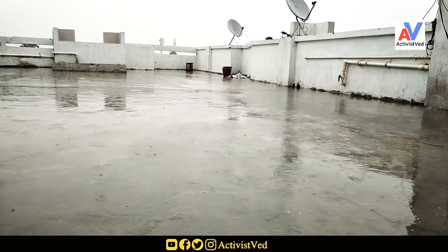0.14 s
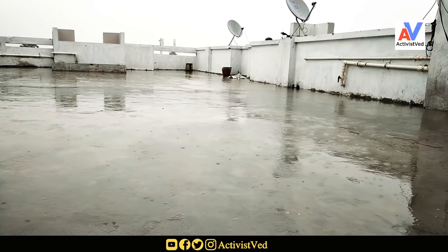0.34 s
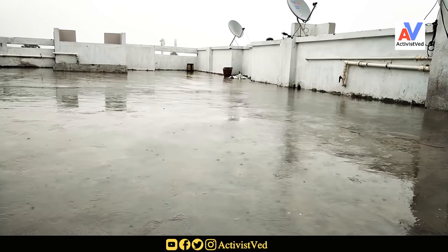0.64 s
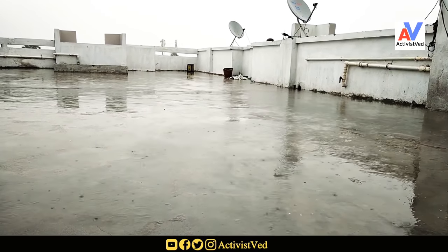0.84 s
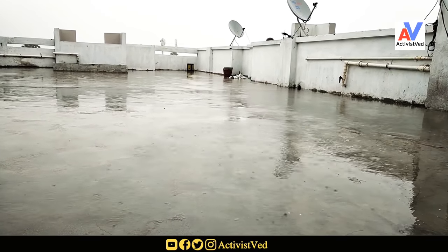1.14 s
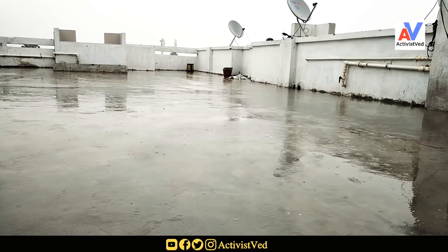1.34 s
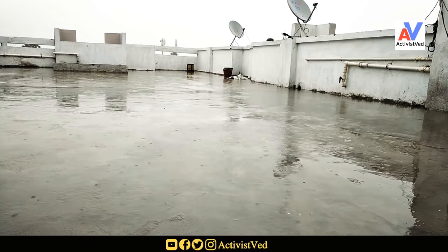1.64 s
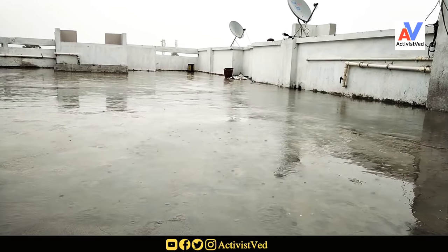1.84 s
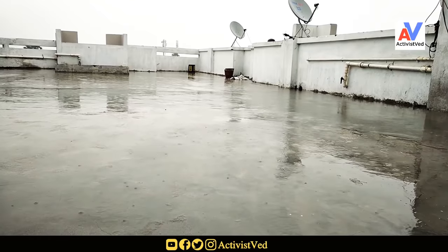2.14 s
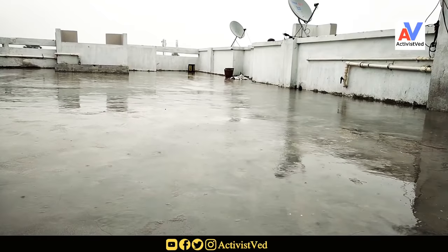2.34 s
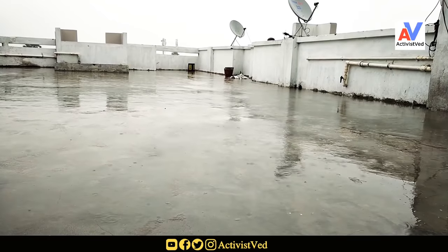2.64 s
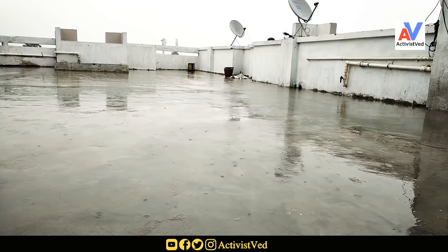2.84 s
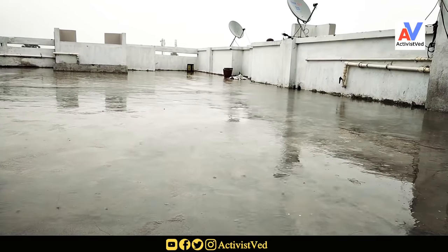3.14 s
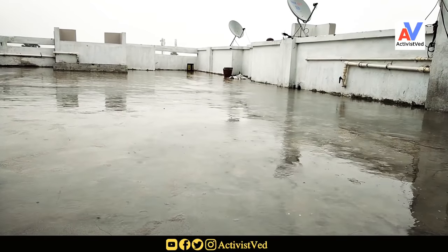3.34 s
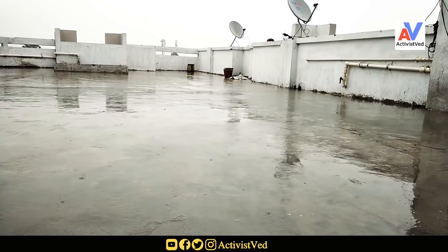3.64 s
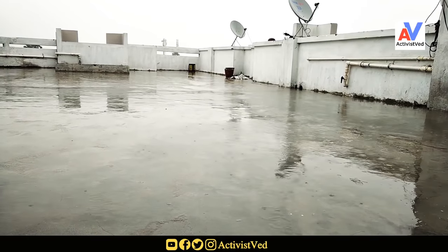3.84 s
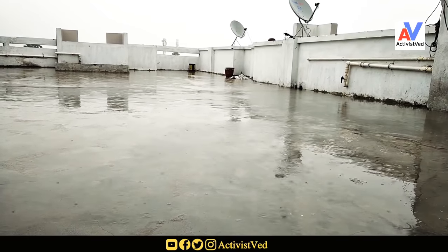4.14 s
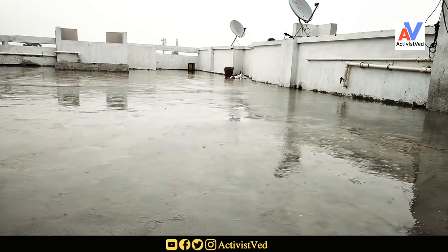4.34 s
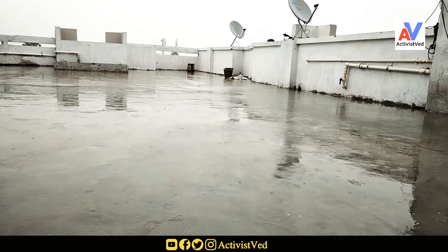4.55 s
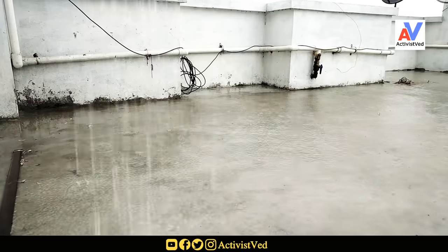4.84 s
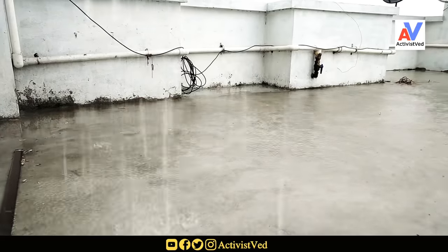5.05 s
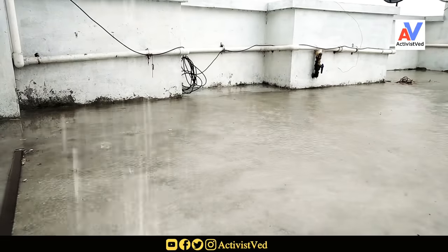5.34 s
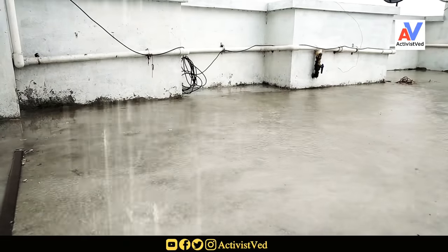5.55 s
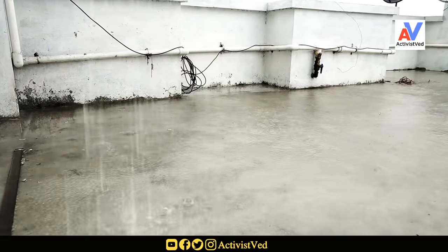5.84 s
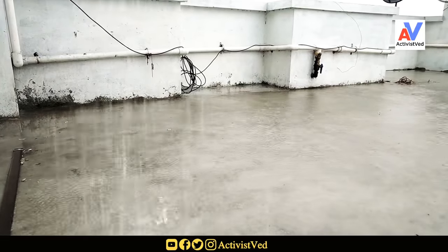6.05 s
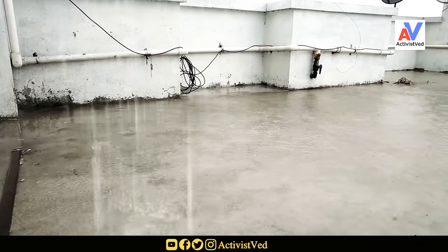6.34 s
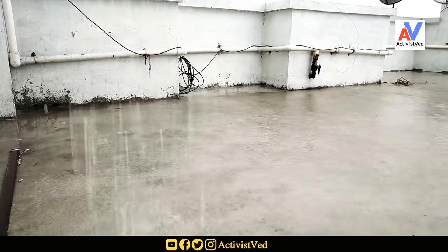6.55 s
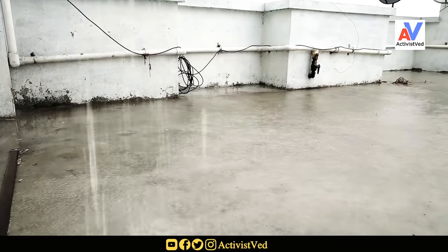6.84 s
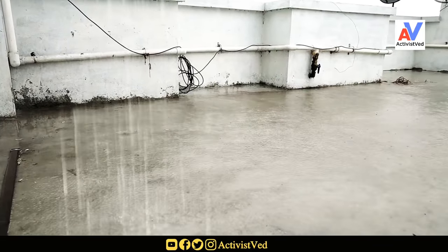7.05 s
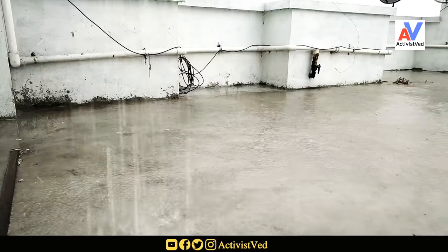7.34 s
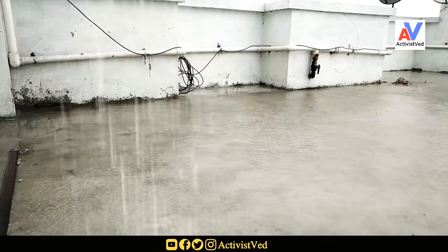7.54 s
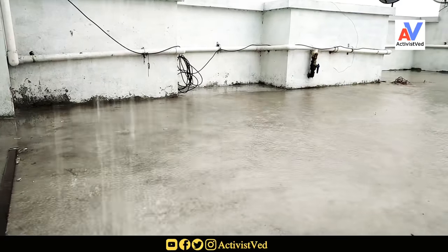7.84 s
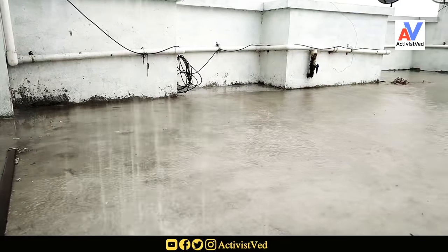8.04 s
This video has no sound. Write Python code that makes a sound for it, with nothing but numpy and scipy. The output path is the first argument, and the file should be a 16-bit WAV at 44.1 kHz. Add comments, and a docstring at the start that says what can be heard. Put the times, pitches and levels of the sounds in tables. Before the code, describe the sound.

Light rain falls on a wide wet concrete rooftop: a soft hissing patter with small crackling splashes and occasional tiny drip pings. Near the middle it stops for an instant, then much louder run-off hits the floor close to a wall, with irregular fat slaps, bright spatter and bubbling. A phone microphone outdoors picks up faint low wind; the deep bass is thin and the very top is dull.

```python
"""Flooded concrete roof in the rain, heard through a phone from two spots with a short silence between them.
Open roof first: a fine patter of random ticks over a noise wash, with single splashes as showers of droplets.
Then an edge where run-off falls in strings of fat drops: slaps, spatter, ringing bubbles, corner resonances.
Walls add echoes and a short noise tail; wind on the microphone is low noise with booming buffets."""
import sys
import numpy as np
from scipy import signal
from scipy.fft import rfft, irfft
from scipy.io import wavfile
from scipy.ndimage import map_coordinates

SR = 44100
rng = np.random.default_rng(int(sys.argv[2]) if len(sys.argv) > 2 else 0)


def unload_audio(sound):
    """Save the sound as a 16-bit wav file, at the path given as the first command line argument."""
    columns = np.transpose(np.atleast_2d(sound))
    # keep every value between -1 and 1, then stretch to whole-number steps
    steps = np.round(np.clip(columns, -1, 1) * 32767)
    wavfile.write(sys.argv[1], SR, steps.astype(np.int16))


N = 360738
TIME_S = np.arange(N) / SR

# slugs of run-off hitting the floor:
# start_s, slap_peak_db, slap_pitch_hz, time_to_thickest_spatter_s, body_db, spray_db (last two before trim)
RUNOFF_SLUGS = [(4.861, -30, 2710, 0.015, -47.5, -60), (5.029, -26.5, 3120, 0.015, -37, -43),
                (5.044, -19, 3140, 0.014, -53, -53), (5.107, -15.5, 2980, 0.0095, -37, -31),
                (5.188, -21, 2630, 0.0028, -35, -36), (5.269, -20.5, 2760, 0.017, -43, -33.5),
                (5.367, -19, 5650, 0.0027, -40, -25), (5.437, -16.5, 3300, 0.013, -30, -39),
                (5.5677, -9.5, 3160, 0.028, -35.5, -49), (5.623, -22.5, 3740, 0.02, -43, -34.5),
                (5.749, -15.5, 3020, 0.0015, -28, -27.5), (5.807, -24, 2560, 0.029, -40, -64),
                (5.884, -20, 3560, 0.0082, -36, -49), (5.977, -26, 3500, 0.0046, -40, -31.5),
                (6.132, -14.5, 5900, 0.0037, -45, -47), (6.151, -18, 4760, 0.0043, -43, -31),
                (6.171, -12.5, 3500, 0.021, -45, -32), (6.245, -20.5, 2580, 0.013, -32.5, -31),
                (6.302, -22.5, 2760, 0.022, -36.5, -55), (6.417, -15.5, 5800, 0.0097, -31.5, -32),
                (6.529, -29, 7800, 0.0075, -34, -33), (6.626, -16, 3330, 0.0099, -29, -37),
                (6.736, -13.5, 5900, 0.0032, -39, -47), (6.99, -18.5, 3070, 0.0027, -36, -56),
                (7.027, -24, 2440, 0.0026, -44, -58), (7.0416, -16.5, 2630, 0.012, -41, -37),
                (7.079, -16, 2740, 0.012, -30, -31.5), (7.132, -20, 3340, 0.013, -28.5, -28),
                (7.244, -26, 2730, 0.059, -46, -42), (7.284, -24, 3800, 0.0056, -27, -31),
                (7.372, -20, 6450, 0.0065, -30, -28.5), (7.474, -28.5, 3400, 0.037, -44, -39.5),
                (7.749, -26, 6630, 0.004, -44, -30.5), (7.831, -13.5, 2500, 0.022, -36, -33),
                (7.944, -10, 3370, 0.025, -36, -51), (8.078, -14, 6100, 0.0071, -42, -32),
                (8.149, -10.5, 3020, 0.0029, -47, -24.5)]
# fat drops slapping among and together with the slugs: start_s, peak_db, pitch_hz
RUNOFF_DROPS = [(4.966, -30, 5900), (5.01, -30, 5540), (5.091, -28, 3700), (5.203, -33, 2940),
                (5.232, -27, 2980), (5.308, -21, 4080), (5.315, -30, 3940), (5.421, -31, 3600),
                (5.431, -22, 2600), (5.457, -23.5, 2410), (5.462, -26, 2700), (5.496, -23, 2610),
                (5.553, -22, 3130), (5.647, -20, 5920), (5.669, -23, 3300), (5.698, -21, 8660),
                (5.71, -21, 5250), (5.761, -20.5, 3360), (5.819, -25, 2580), (5.849, -24, 6810),
                (5.876, -19, 4030), (5.895, -20.5, 2850), (5.921, -26, 9200), (5.933, -25.5, 3620),
                (5.983, -18, 5560), (6.184, -23.5, 3200), (6.337, -21, 2470), (6.386, -21, 4800),
                (6.426, -22, 5150), (6.636, -20, 2640), (6.657, -22, 2950), (6.735, -16.5, 2740),
                (6.743, -19.5, 5800), (6.8, -30, 3740), (6.816, -30, 3620), (6.884, -39, 3750),
                (6.9, -26.5, 7060), (6.95, -21.5, 4750), (7.085, -22, 3340), (7.123, -15, 3000),
                (7.148, -32, 5400), (7.162, -18, 3000), (7.26, -18.5, 4980), (7.295, -15.5, 3040),
                (7.488, -18, 5510), (7.508, -26, 2580), (7.533, -24, 2620), (7.6, -27, 4800),
                (7.621, -21, 5970), (7.653, -24.5, 6300), (7.793, -22.5, 4170), (7.849, -17, 6850),
                (7.895, -24, 8800), (7.914, -23, 3880), (7.944, -15, 5440), (7.959, -18.5, 3270),
                (7.969, -15, 2980), (8.113, -21, 3350), (8.155, -16.5, 5640)]
# flurries of smaller drops among the slugs: start_s, body_db (before trim), body_resonance_hz
RUNOFF_FLURRIES = [(5.311, -32.5, 4250), (5.552, -37, 3100), (5.574, -32, 5880), (5.636, -41, 6000),
                   (5.917, -34, 8900), (6.126, -42, 6100), (6.144, -37, 4930), (6.25, -36, 2450),
                   (6.402, -27, 5900), (6.824, -42.5, 3720), (7.182, -41, 5600), (7.486, -43, 5500),
                   (7.504, -39, 2540), (7.645, -43, 6150), (7.92, -32, 2860), (8.134, -30, 5600)]
# flow of the run-off, sets patter and fizz: time_s, level_db (before surges and layer trims)
RUNOFF_FLOW = [(4.98, -42.5), (5.14, -33.5), (6.2, -32.5), (6.95, -35), (7.3, -33), (7.43, -36.5),
               (7.55, -33), (8.18, -31.5)]
# colour of run-off splashes and slaps: freq_hz, gain_db
RUNOFF_COLOUR = [(100, -54), (400, -12), (1750, -8.5), (2150, 4), (2450, 12.5), (2950, -2), (3450, 6.5),
                 (4500, -1.5), (5400, 1.5), (7000, 3), (7700, -5), (9000, 4), (9900, -5.5), (11100, -29)]
# colour of run-off patter: freq_hz, gain_db
RUNOFF_PATTER_COLOUR = [(240, -28), (400, -13), (668, -5.5), (1050, -6.5), (1720, -8.5), (2490, 4),
                        (2950, 4), (3480, 0), (4530, 4.5), (5890, 5), (7780, 1), (8810, 8), (9710, 2.5),
                        (11000, -21.5), (14300, -57), (22000, -120)]
# hollow resonances of the wall corner: freq_hz, q, gain_db
CORNER_MODES = [(450, 24, -8), (656, 27, 11.5), (1055, 33, 13), (1258, 105, 12), (1513, 65, 8.5)]
# gurgle under the run-off: time_s, level_db
GURGLE = [(4.92, -79), (5.08, -61.5), (5.45, -60.5), (5.9, -56.5), (6.35, -60.5), (6.7, -67.5),
          (6.98, -66.5), (7.15, -54.5), (7.45, -61), (7.7, -59.5), (8.18, -57.5)]
# heaviest splashes knock on the slab: start_s, level_db
KNOCKS = [(5.559, -42), (5.745, -50), (7.282, -44.5), (7.832, -45), (7.943, -51)]
# colour of a knock: freq_hz, gain_db
KNOCK_COLOUR = [(80, -27), (200, 8), (500, -11), (1200, 16), (1700, 11), (2600, -22)]
# loudest open-roof splashes: start_s, time_to_thickest_spatter_s, body_resonance_hz, body_db, spray_db
ROOF_SPLASHES = [(0.0, 0.01, 3570, -46, -58), (0.132, 0.0088, 3380, -46, -69),
                 (0.245, 0.015, 6600, -47, -53), (0.265, 0.025, 2640, -47, -47.5),
                 (0.382, 0.017, 2850, -43, -51), (0.466, 0.015, 4220, -50, -66),
                 (0.622, 0.01, 6520, -53, -66), (0.715, 0.0099, 3730, -51, -50),
                 (0.884, 0.034, 3280, -50.5, -57), (0.955, 0.023, 8500, -53, -62),
                 (1.035, 0.024, 4950, -43.5, -62), (1.094, 0.019, 3070, -47.5, -48),
                 (1.276, 0.0088, 2920, -50, -50), (1.398, 0.0091, 2190, -50.5, -59),
                 (1.482, 0.021, 3280, -52, -54), (1.568, 0.0092, 3700, -50, -64),
                 (1.83, 0.026, 6200, -50, -55), (2.06, 0.019, 2540, -55.5, -48.5),
                 (2.228, .02, 4600, -47, -63), (2.262, 0.0072, 5660, -38.5, -63),
                 (2.395, 0.024, 3280, -55, -56), (2.694, 0.015, 4100, -41.5, -53),
                 (2.775, 0.014, 3900, -58, -55), (2.848, 0.013, 4760, -47, -59),
                 (2.92, 0.0084, 6440, -53, -56), (2.997, 0.013, 2670, -44, -71),
                 (3.183, 0.012, 3580, -50, -45.5), (3.256, .019, 6140, -45.5, -47),
                 (3.36, .018, 6300, -57, -55), (3.535, 0.018, 1980, -52.5, -68),
                 (3.63, 0.019, 3400, -55.5, -49), (3.722, 0.016, 3700, -47.5, -45.5),
                 (3.86, .02, 4630, -50, -60), (3.94, 0.014, 5200, -65, -52), (4.06, 0.018, 6570, -60, -48),
                 (4.295, 0.019, 3230, -48.5, -61), (4.335, .02, 5950, -54, -52),
                 (4.431, 0.018, 2650, -49, -48), (4.5, 0.012, 5270, -58, -44),
                 (4.568, .018, 2820, -51, -41.5), (4.721, 0.021, 2510, -53.5, -75)]
# large drops cracking on the open roof: start_s, peak_db, pitch_hz
ROOF_DROPS = [(0.014, -36, 4070), (0.394, -36, 3740), (0.885, -33, 4130), (1.037, -33.5, 4900),
              (1.106, -33, 4330), (1.485, -34, 3970), (1.958, -39, 4860), (2.233, -36.5, 4270),
              (2.266, -31.5, 5800), (2.703, -34.5, 4540), (3.006, -32.5, 3650), (3.729, -35, 4540),
              (4.41, -41, 2180), (4.445, -39, 3280)]
# single drips ringing in the standing water: start_s, peak_db, pitch_hz
PINGS = [(0.627, -46, 6520), (1.05, -42, 4995), (2.78, -56, 5000), (2.852, -48, 2850), (2.855, -39.5, 4750),
         (3.195, -41, 5350), (3.32, -51, 5000), (3.325, -49, 6450), (4.085, -47, 4980), (4.26, -46, 7000),
         (4.3, -54, 4200), (4.35, -49, 6650), (4.36, -57, 4130), (4.445, -45, 3350), (4.45, -44, 6700),
         (4.458, -43, 4970), (4.49, -47, 3070), (4.505, -56, 4630), (4.51, -48, 3530), (4.52, -55, 5700),
         (4.54, -52, 2900), (4.575, -41, 5020)]
# steady open-roof patter: time_s, level_db (before trim and surges)
ROOF_RAIN = [(0, -49.5), (1.0, -49), (1.3, -50.5), (1.6, -50), (4.05, -50), (4.2, -52.5), (4.4, -49),
             (4.75, -51)]
# colour of open-roof splashes: freq_hz, gain_db
ROOF_COLOUR = [(100, -56), (300, -10), (500, -27), (1150, -6), (1550, 6), (2100, 10), (3000, 0),
               (3700, 7.5), (5000, 6), (6700, 6), (7500, -9.5), (8700, 3), (9700, -6), (10900, -66)]
# colour of open-roof patter and large drops: freq_hz, gain_db
ROOF_PATTER_COLOUR = [(120, -41), (200, 2.5), (257, -7), (336, -4), (727, -9), (875, -7.5), (1070, -10.5),
                      (1500, -9), (2430, -1.5), (4760, 1), (6330, -1), (7360, -3), (9300, -1.5),
                      (9950, -6.5), (11000, -27.5), (14300, -73), (22000, -120)]
# large air pockets glugging in the puddles: start_s, peak_db, pitch_hz
GLUGS = [(3.295, -52.5, 274), (3.522, -52.5, 435), (3.57, -54, 420), (4.274, -56, 490), (5.06, -47.5, 260),
         (5.66, -48, 606), (5.885, -49, 674), (5.914, -46, 432), (6.018, -49, 405), (6.3, -49, 300),
         (6.358, -47, 670), (6.361, -47, 444), (7.124, -47.5, 270), (7.711, -54, 260), (7.841, -44, 668)]
# strongest wind buffets: middle_s, level_db (before buffet trim), pitch_hz
BUFFETS = [(0.838, -54.5, 121), (1.151, -62, 126), (1.879, -59, 135), (2.673, -55.5, 129),
           (2.787, -53, 157), (2.88, -54.5, 191), (3.338, -52.5, 141), (3.578, -52.5, 123),
           (4.116, -55, 140), (4.273, -55, 164), (4.332, -56, 128), (4.559, -53.5, 126),
           (4.732, -45.5, 160), (5.313, -58, 140), (5.542, -48.5, 146), (5.737, -54, 161),
           (6.069, -48, 146), (7.299, -46, 124), (7.386, -49.5, 140), (7.848, -50, 162)]
# breeze on the microphone: time_s, level_db (before flutter)
BREEZE = [(0, -76), (2.4, -72.5), (2.8, -68.5), (4.7, -67), (5.2, -59.5), (8.18, -63)]
# colour of the breeze: freq_hz, gain_db
WIND_COLOUR = [(25, -15), (55, -9), (90, 2.5), (125, 12.5), (180, 10), (250, -11), (500, -78), (1500, -74)]

ROOF_END_S, RUNOFF_START_S = 4.76, 4.84
LOWS_SETTLE_S = 0.27  # build-up of wind and glugs at the second spot
SPATTER_LEAD_S, BODY_PITCH_RATIO = 0.0009, 0.92  # spatter starts before the slap and rings lower
TRAIL_GAP_S, TRAIL_STEP_DB = 0.013, -7.5  # mean gap and level step between trailing drops
SLAP_RING_S, SLAP_RISE_S, SLAP_CRACK = .001, .0003, .7
RUNOFF_SPREAD_DB, RUNOFF_COMB_DB, RUNOFF_BODY_Q = 5.5, -3, 1.8
FLURRY_RISE_S, FLURRY_SPRAY_DB, FLURRY_Q = .006, -7, 5  # spray relative to body
STRAY_DB, STRAY_LOW_HZ, STRAY_HIGH_HZ, STRAY_RISE_S = -47, 3020, 7100, 0.0018  # mean level before trim
FAINT_DB, FAINT_LOW_HZ, FAINT_HIGH_HZ, FAINT_RISE_S = -62, 2820, 7200, .015  # mean body level
ROOF_BODY_Q = 2.3
ROOF_PATCHY_DB, RUNOFF_PATCHY_DB = 4, 10
ROOF_SURGE_DB, RUNOFF_SURGE_DB = .8, 2.2
ROOF_ECHO_DB, ROOF_TAIL_DB, CORNER_ECHO_DB, CORNER_TAIL_DB = -6, -14, -13, -20  # re direct, before scaling
GLUG_GLIDE_PER_S = .5
TOP_HZ = 11200


def runoff():
    """Strings of water break up on the floor close by; the puddle fizzes, plinks and gurgles."""
    flow_db = curve(RUNOFF_FLOW) + RUNOFF_SURGE_DB * walk(32)
    hits = falling_water()
    rain = undb(-9.0) * patter(RUNOFF_PATTER_COLOUR, rate_per_s=1100, wash_db=0,
                               patchy_db=RUNOFF_PATCHY_DB, patch_per_s=50, patch_width_hz=336)
    fizz = undb(-16) * bubbles(3200, 8000, cycles=110, glide=0, count=4000)
    corner = sum(undb(db) * resonate(hits, hz, q) for hz, q, db in CORNER_MODES)
    stir = stirring(hits, calm_s=0.012)
    plinks = undb(-48) * stir * bubbles(3000, 7400, cycles=140, glide=0, count=1500)
    gurgle = undb(curve(GURGLE)) * bubbles(215, 1357, cycles=34, glide=.015, count=1700)
    # rain on the rest of the roof
    distant = undb(-58) * unit(through(rng.standard_normal(N), response(ROOF_PATTER_COLOUR)))
    wet = undb(flow_db) * (rain + fizz) + distant + hits + corner + plinks + gurgle + knocks(rise_s=0.016)
    return walls(wet, echo_db=CORNER_ECHO_DB, tail_db=CORNER_TAIL_DB, t60_s=0.09)


def falling_water():
    """Slugs slap the floor inside showers of spatter; fat drops and flurries fall among them."""
    showers = [(s - SPATTER_LEAD_S, rise_s, hz * BODY_PITCH_RATIO, body_db, spray_db)
               for s, _, hz, rise_s, body_db, spray_db in RUNOFF_SLUGS]
    strays = chance_events(RUNOFF_START_S + LOWS_SETTLE_S, N / SR, STRAY_DB, 4,
                           STRAY_LOW_HZ, STRAY_HIGH_HZ, count=50)
    showers += [(s, STRAY_RISE_S, hz, db, db) for s, db, hz in strays]
    spatter = splashes(showers, RUNOFF_COLOUR, body_per_s=600, spray_per_s=1500, spread_db=RUNOFF_SPREAD_DB,
                       body_q=RUNOFF_BODY_Q, spray_hz=5000, comb_db=RUNOFF_COMB_DB)
    flurries = [(s, FLURRY_RISE_S, hz, db, db + FLURRY_SPRAY_DB) for s, db, hz in RUNOFF_FLURRIES]
    spatter += splashes(flurries, RUNOFF_COLOUR, body_per_s=510, spray_per_s=1800, spread_db=RUNOFF_SPREAD_DB,
                        body_q=FLURRY_Q, spray_hz=4750, comb_db=RUNOFF_COMB_DB)
    slugs = trailed([row[:3] for row in RUNOFF_SLUGS], count=2)
    slug_slaps = slaps(slugs, RUNOFF_COLOUR, crack=SLAP_CRACK, spatter=0.19, spatter_s=0.0054, comb_db=-12)
    drop_slaps = slaps(RUNOFF_DROPS, RUNOFF_COLOUR, crack=SLAP_CRACK, spatter=0.15, spatter_s=0.013,
                       comb_db=-12.5)
    return undb(-0.5) * spatter + slug_slaps + drop_slaps


def slaps(drops, colour, crack, spatter, spatter_s, comb_db):
    """A fat drop cracks on the film, the air caught under it rings briefly and flung droplets land."""
    out, tone, t = np.zeros(N), response(colour), TIME_S[:SR // 40]
    for s, peak_db, hz in drops:
        ring = np.sin(2 * np.pi * hz * t) * np.exp(-t / SLAP_RING_S) * (1 - np.exp(-t / SLAP_RISE_S))
        ring[0] += crack
        droplets = unit(resonate(ticks(len(t), 2500, 7.9), hz, 0.86))
        ring += spatter * droplets * np.exp(-t / spatter_s)
        slap = scatter(through(ring, tone), comb_db)
        add(out, s, undb(peak_db) * slap / np.abs(slap).max())
    return out


def splashes(table, colour, body_per_s, spray_per_s, spread_db, body_q, spray_hz, comb_db):
    """A shower of droplets thickens and thins: coarse ones ring the film, fine ones hiss."""
    out, tone, t = np.zeros(N), response(colour), TIME_S[:SR // 5]
    highpass = signal.butter(2, spray_hz, "high", fs=SR, output="sos")
    for s, rise_s, hz, body_db, spray_db in table:
        shower = t / rise_s * np.exp((1 - (t / rise_s) ** 1.5) / 1.5)  # peaks at rise_s
        spot = scatter(tone, comb_db)
        coarse = ticks(len(t), body_per_s, spread_db) * shower
        body = resonate(resonate(coarse, hz, body_q), hz, body_q)
        spray = signal.sosfilt(highpass, ticks(len(t), spray_per_s, spread_db) * shower)
        splash = undb(body_db) * unit(through(body, spot)) + undb(spray_db) * unit(through(spray, spot))
        add(out, s, splash * np.sqrt(np.mean(shower ** 2)))
    return out


def trailed(slugs, count):
    """Ever smaller drops follow each slug (start_s, peak_db, pitch_hz) at uneven gaps."""
    drops = list(slugs)
    for (s, db, hz), behind in zip(slugs, rng.random((len(slugs), count, 2))):
        for gap, pitch in behind:
            s, db = s + TRAIL_GAP_S * (.5 + gap), db + TRAIL_STEP_DB
            drops.append((s, db, hz * 2 ** (.5 * (pitch - .5))))
    return drops


def knocks(rise_s):
    """A slug of water spreads on the concrete with a short dull knock."""
    out, t = np.zeros(N), TIME_S[:SR // 5]
    push = t / rise_s * np.exp(1 - t / rise_s)
    for s, db in KNOCKS:
        knock = through(rng.standard_normal(len(t)) * push, response(KNOCK_COLOUR))
        add(out, s, undb(db) * unit(knock) * np.sqrt(np.mean(push ** 2)))
    return out


def open_roof():
    """Uneven rain all round, with crackling splashes that trap tiny bubbles in the standing water."""
    rain = patter(ROOF_PATTER_COLOUR, rate_per_s=3000, wash_db=1,
                  patchy_db=ROOF_PATCHY_DB, patch_per_s=35, patch_width_hz=450)
    spots = chance_events(0, ROOF_END_S, FAINT_DB, 2.6, FAINT_LOW_HZ, FAINT_HIGH_HZ, count=28)
    faint = [(s, FAINT_RISE_S, hz, db, db + 0.5) for s, db, hz in spots]
    drops = splashes(ROOF_SPLASHES + faint, ROOF_COLOUR, body_per_s=1300, spray_per_s=3000, spread_db=5.5,
                     body_q=ROOF_BODY_Q, spray_hz=4200, comb_db=-16.5)
    cracks = slaps(ROOF_DROPS, ROOF_PATTER_COLOUR, crack=1.0, spatter=0.22, spatter_s=0.0037, comb_db=-4.0)
    stir = stirring(drops, calm_s=.04)
    plinks = undb(-64) * stir * bubbles(3600, 7200, cycles=110, glide=0, count=900)
    pings = rings(PINGS, swell_s=0.0059, glide_per_s=0.034)
    plops = undb(-71.5) * bubbles(280, 900, cycles=20, glide=.05, count=500)
    rain_db = curve(ROOF_RAIN) - 1.73 + ROOF_SURGE_DB * walk(13)
    wet = undb(rain_db) * rain + drops + cracks + plinks + pings + plops
    return walls(wet, echo_db=ROOF_ECHO_DB, tail_db=ROOF_TAIL_DB, t60_s=0.29, count=40)


def patter(colour, rate_per_s, wash_db, patchy_db, patch_per_s, patch_width_hz):
    """Countless small raindrops: the nearer ones tick, the far ones merge into a wash."""
    near = unit(ticks(N, rate_per_s, 3))
    far = undb(wash_db) * rng.standard_normal(N)
    rain = through(near + far, response(colour))
    return unit(patchy(rain, patchy_db, patch_per_s, patch_width_hz))


def patchy(x, depth_db, patch_per_s, width_hz, size=256):
    """Drops land on ever different spots, so pitch bands swell and fade on their own."""
    hz, t, spectra = signal.stft(x, SR, nperseg=size)
    chance = rng.standard_normal((size, 4 * size))
    grid = np.meshgrid(hz / width_hz, t * patch_per_s, indexing="ij")
    field = map_coordinates(chance, grid, order=1, mode="wrap")
    return signal.istft(spectra * undb(depth_db * np.tanh(field)), SR, nperseg=size)[1][:len(x)]


def ticks(size, rate_per_s, spread_db):
    """Droplet impacts at random moments: many small ones, a few large."""
    when, strength, sign = rng.random((3, size))
    rarity = np.minimum(-np.log(1 - strength), 5)
    return (when < rate_per_s / SR) * np.sign(sign - .5) * undb(spread_db * rarity)


def bubbles(low_hz, high_hz, cycles, glide, count):
    """Trapped air pockets ring for some cycles, rising in pitch by the fraction glide; rms 1."""
    out = np.zeros(N)
    for when, pitch, strength in rng.random((count, 3)):
        hz = low_hz * (high_hz / low_hz) ** pitch
        age = np.linspace(0, 1, int(cycles * SR / hz))
        envelope = np.tanh(20 * age) * np.exp(-np.log(100) * age)
        tone = np.sin(2 * np.pi * cycles * age * (1 + glide * age / 2))
        add(out, when * N / SR, strength ** np.pi * envelope * tone)
    return unit(out)


def rings(table, swell_s, glide_per_s):
    """A trapped air pocket swells, rings briefly and rises a little in pitch."""
    out, t = np.zeros(N), TIME_S[:SR // 5]
    envelope = t / swell_s * np.exp(1 - t / swell_s)
    for s, db, hz in table:
        tone = np.sin(2 * np.pi * hz * t * (1 + glide_per_s * t / 2))
        add(out, s, undb(db) * envelope * tone)
    return out


def stirring(hits, calm_s):
    """Puddle agitation: jumps with each splash and calms again; rms 1."""
    return unit(through(np.abs(hits), np.exp(-TIME_S[:SR // 2] / calm_s)))


def scatter(x, echo_db, count=4):
    """Short paths from each landing spot to the microphone comb its colour."""
    for path, sign in rng.random((count, 2)):
        lag = int(SR * (.0004 + .005 * path))
        x = x + np.sign(sign - .5) * undb(echo_db) * np.pad(x, (lag, 0))[:len(x)]
    return x


def walls(x, echo_db, tail_db, t60_s, count=8):
    """Hard echoes from floor and walls, then a short decaying noise tail."""
    t = TIME_S[:SR // 4]
    echoes = np.zeros(len(t))
    lags_s = rng.uniform(.002, .028, count)
    echoes[(lags_s * SR).astype(int)] = np.exp(-lags_s / 0.023)
    tail = rng.standard_normal(len(t)) * undb(-60 * t / t60_s) * np.minimum(t / .01, 1)
    impulse = undb(echo_db) * echoes / np.linalg.norm(echoes) + undb(tail_db) * tail / np.linalg.norm(tail)
    impulse[0] = 1  # direct sound
    return through(x, impulse / np.linalg.norm(impulse))


def wind(buffet_trim_db, width_s, q):
    """A low flutter of air on the microphone, with short booming buffets."""
    t = TIME_S[:SR // 5]
    air = unit(through(rng.standard_normal(N), response(WIND_COLOUR, size=8192)))
    out = air * undb(curve(BREEZE) + 5 * walk(14))
    half_s = t[-1] / 2
    swell = np.exp(-.5 * ((t - half_s) / width_s) ** 2)
    for middle_s, db, hz in BUFFETS:
        boom = resonate(resonate(rng.standard_normal(len(t)), hz, q), hz, q)
        puff = unit(swell * boom) * np.sqrt(np.mean(swell ** 2))
        add(out, middle_s - half_s, puff * undb(db + buffet_trim_db))
    return out


def chance_events(start_s, end_s, mean_db, spread_db, low_hz, high_hz, count):
    """Rows (start_s, level_db, pitch_hz) at random, one per equal time slot."""
    when, strength, pitch = rng.random((count, 3)).T
    times_s = start_s + (end_s - start_s) * (np.arange(count) + when) / count
    levels_db = mean_db + spread_db * (2 * strength - 1)
    return np.transpose([times_s, levels_db, low_hz * (high_hz / low_hz) ** pitch])


def undb(db):
    """Decibels to gain."""
    return 10 ** (np.asarray(db) / 20)


def unit(x):
    """Scale to rms 1."""
    return x / np.sqrt(np.mean(x ** 2) + 1e-20)


def curve(rows):
    """Join (time_s, value) rows by straight lines."""
    return np.interp(TIME_S, *np.transpose(rows))


def add(out, start_s, sound):
    """Mix a sound in at start_s."""
    start = int(np.clip(start_s * SR, 0, N - 1))
    out[start:start + len(sound)] += sound[:N - start]


def walk(points_per_s):
    """Slow random drift through normal points joined by lines."""
    points = rng.standard_normal(1024)
    return np.interp(TIME_S * points_per_s, np.arange(len(points)), points)


def response(colour, size=2048):
    """Minimum-phase impulse response of a (freq_hz, gain_db) colour, by folding the cepstrum."""
    hz, db = np.transpose(colour)
    freq_hz = np.arange(size // 2 + 1) * SR / size + 1
    cepstrum = irfft(np.log(undb(np.interp(np.log(freq_hz), np.log(hz), db))))
    cepstrum[1:size // 2] *= 2
    cepstrum[size // 2 + 1:] = 0
    return irfft(np.exp(rfft(cepstrum)))[:size // 2]


def through(x, impulse):
    """Convolve with an impulse response, keeping the length."""
    return signal.fftconvolve(x, impulse)[:len(x)]


def resonate(x, hz, q):
    """Two-pole resonance, gain 1 at its centre."""
    return signal.lfilter(*signal.iirpeak(min(hz, SR / 3), q, fs=SR), x)


def scene():
    """Open roof, short silence, then run-off fading in; wind and glugs at both spots."""
    glugs = rings(GLUGS, swell_s=0.0074, glide_per_s=GLUG_GLIDE_PER_S)
    lows = wind(buffet_trim_db=2.5, width_s=0.02, q=2.9) + glugs
    first = np.clip((ROOF_END_S - TIME_S) / .003, 0, 1)
    second = np.clip((TIME_S - RUNOFF_START_S) / .025, 0, 1)
    settle = np.clip((TIME_S - RUNOFF_START_S) / LOWS_SETTLE_S, 0, 1)
    return (first * (open_roof() + lows) + second * (runoff() + settle * lows))[None]


def record(dry):
    """The phone thins the deep bass and cuts the top octave steeply."""
    thinned = signal.sosfilt(signal.butter(2, 80, "high", fs=SR, output="sos"), dry)
    return signal.sosfilt(signal.ellip(10, .2, 70, TOP_HZ, fs=SR, output="sos"), thinned)


dry = scene()
out = record(dry)
unload_audio(out)
```